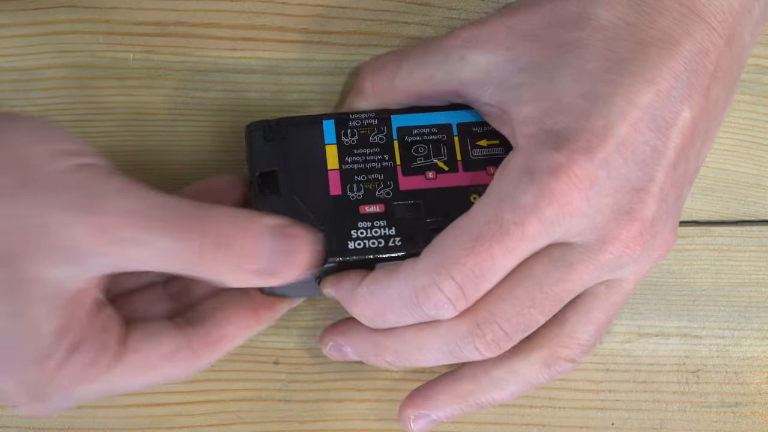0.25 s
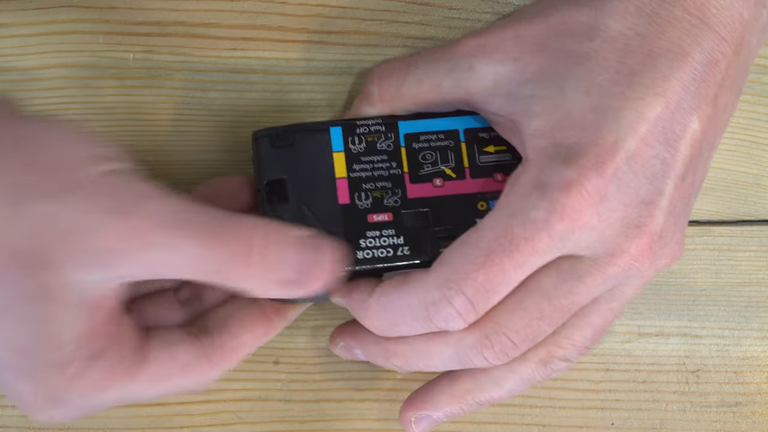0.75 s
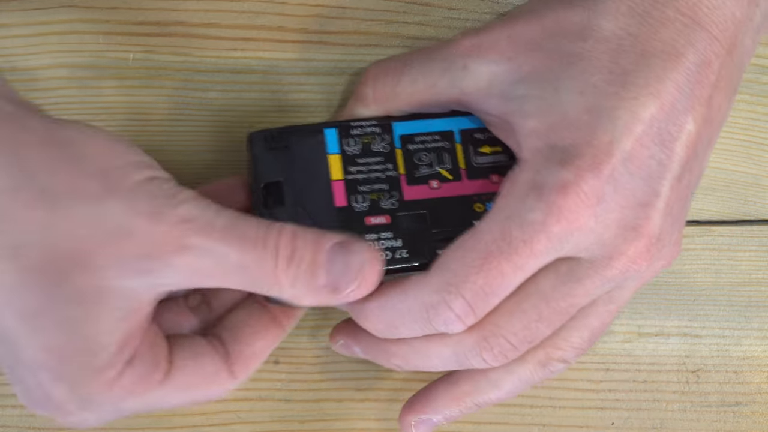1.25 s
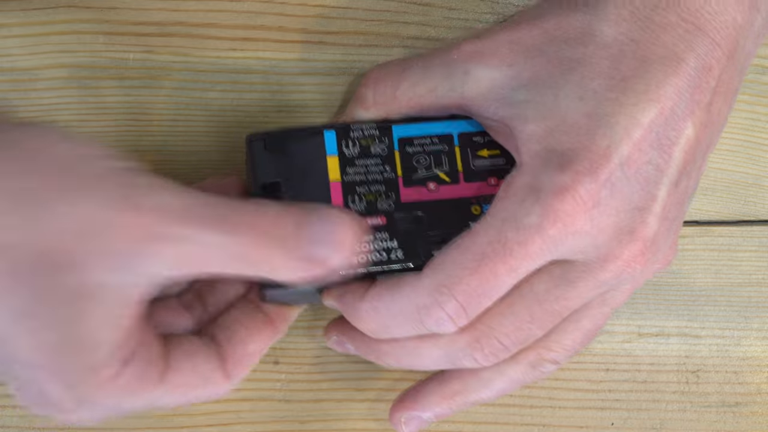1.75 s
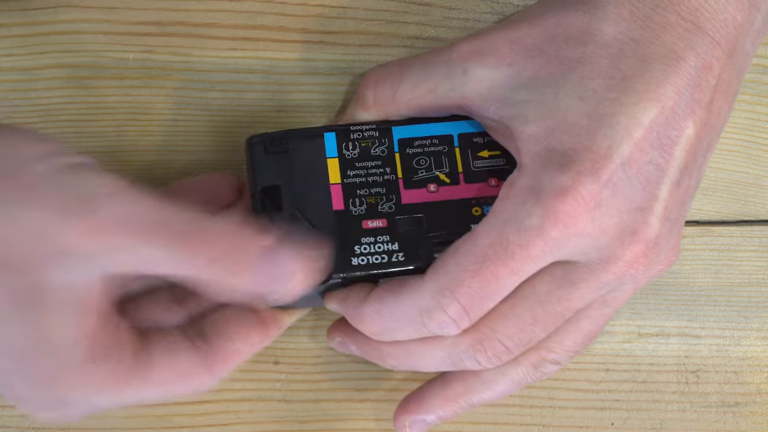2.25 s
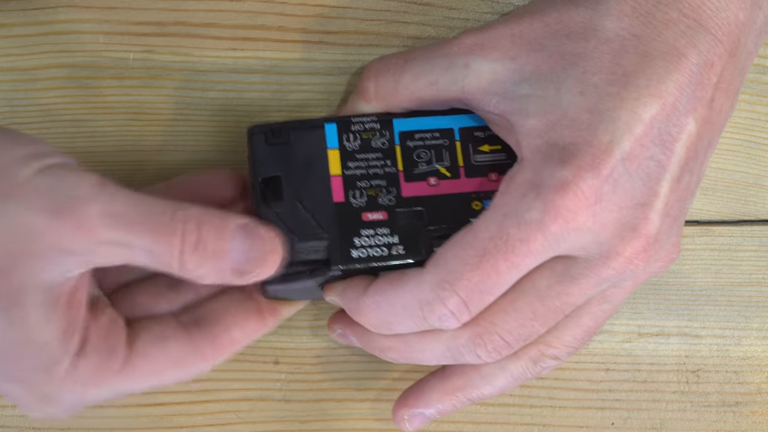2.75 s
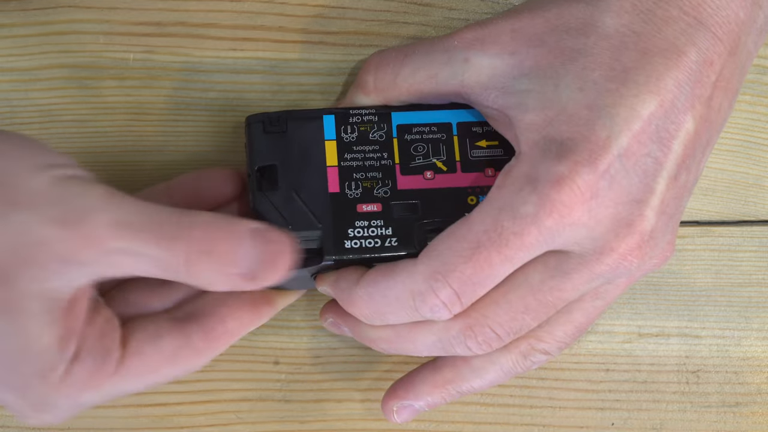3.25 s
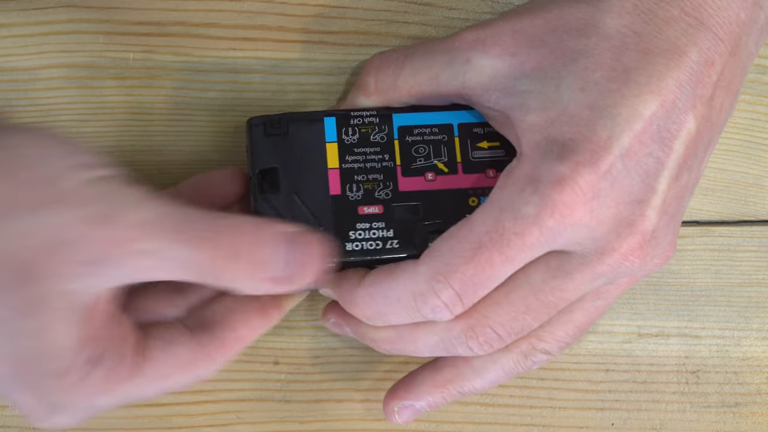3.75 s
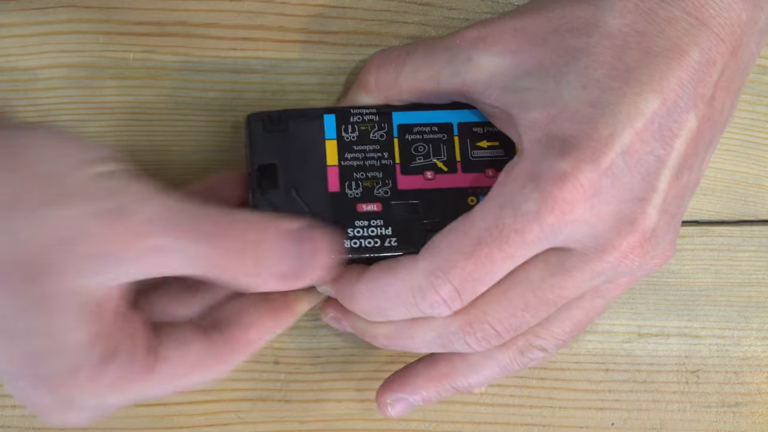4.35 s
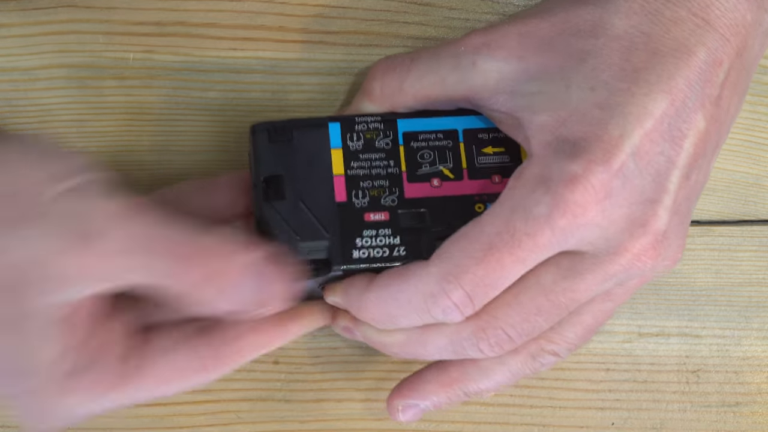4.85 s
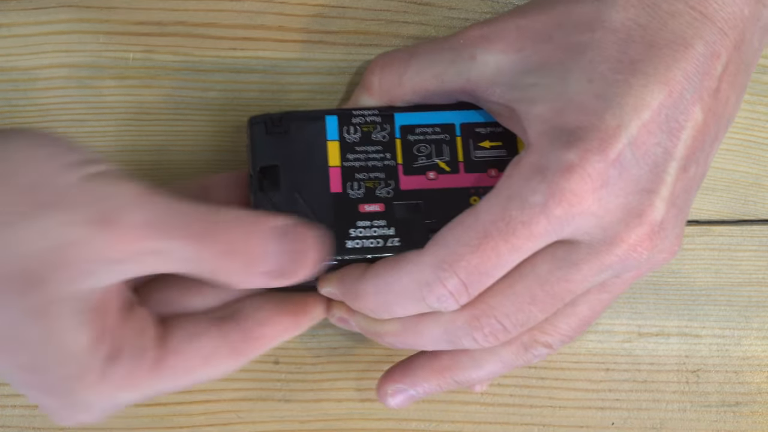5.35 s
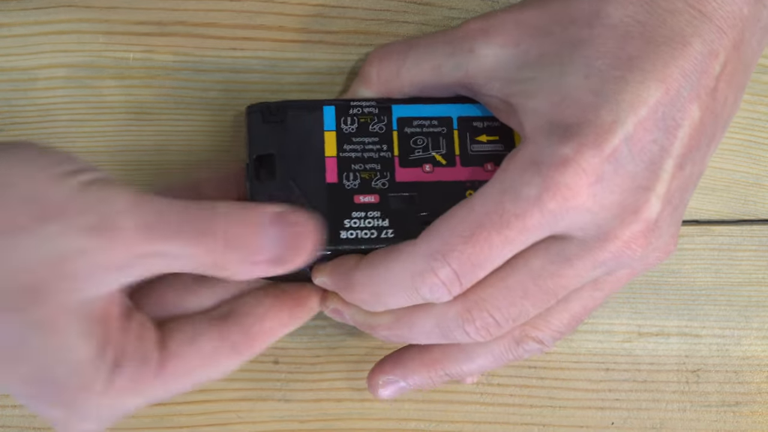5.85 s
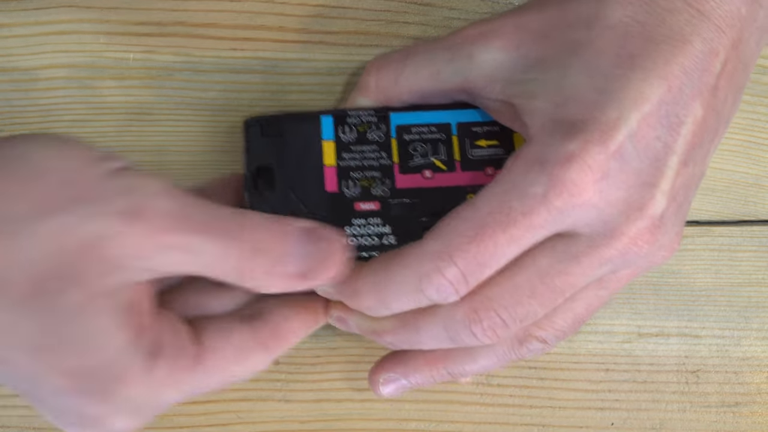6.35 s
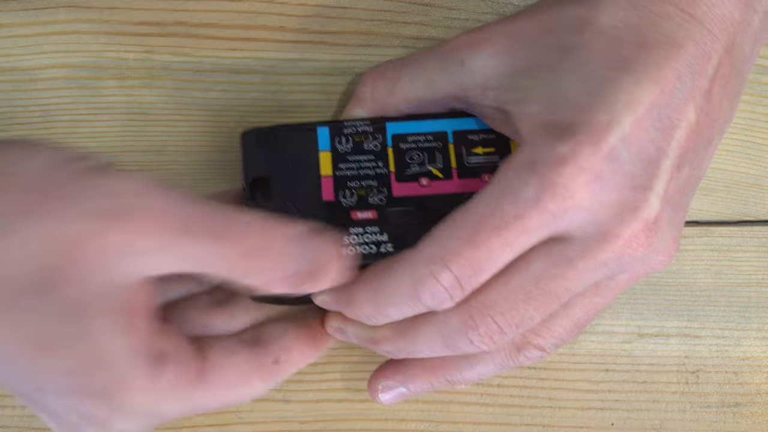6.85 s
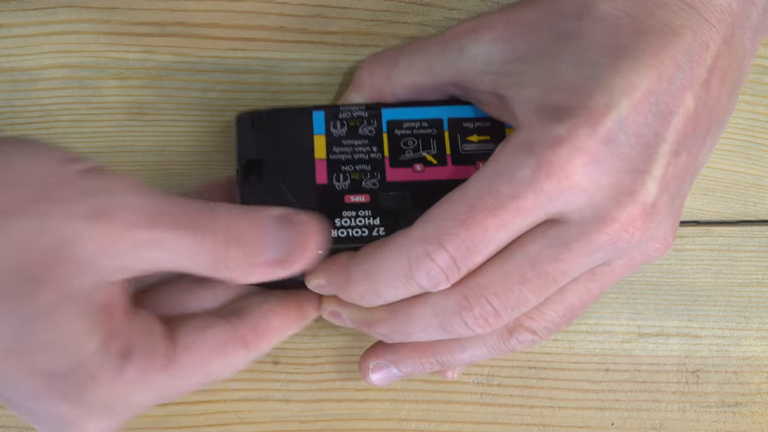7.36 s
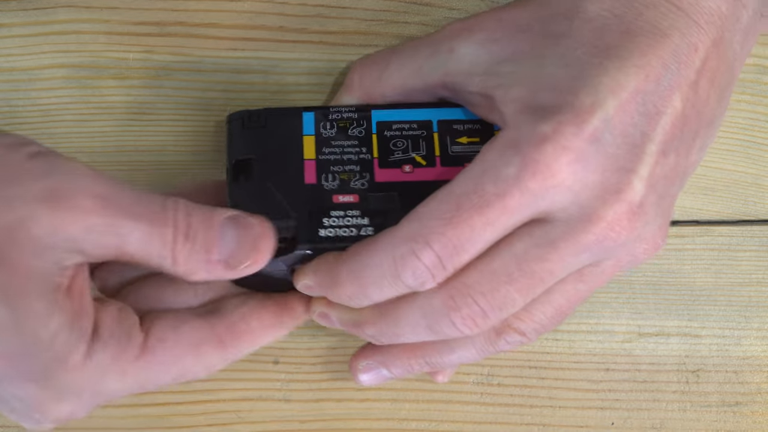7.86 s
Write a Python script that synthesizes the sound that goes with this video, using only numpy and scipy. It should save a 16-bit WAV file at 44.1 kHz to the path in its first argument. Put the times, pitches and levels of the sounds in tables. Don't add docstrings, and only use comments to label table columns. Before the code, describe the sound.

A small plastic thumbwheel ratchets in short bright zips, long even pulls turning to rapid flicks, with occasional sharp latch clacks, close up.

```python
import sys
import numpy as np
from scipy import signal
from scipy.fft import rfft, irfft
from scipy.io import wavfile
from scipy.ndimage import uniform_filter1d

SR = 44100
rng = np.random.default_rng(int(sys.argv[2]) if len(sys.argv) > 2 else 0)


def unload_audio(sound):
    columns = np.transpose(np.atleast_2d(sound))
    steps = np.round(np.clip(columns, -1, 1) * 32767)
    wavfile.write(sys.argv[1], SR, steps.astype(np.int16))


def field_ratio(decibels):
    return 10 ** (np.asarray(decibels, dtype=float) / 20)


N = 356769

# start in seconds, length in seconds, thumb force in dB,
# gain from start to end in dB, slip at the end in dB.
LONG_PULLS = [(0.0248, 0.076, -29, 7, -5), (0.295, 0.087, -30, 9, -20), (0.5559, 0.083, -25.5, 6, -26),
              (0.8203, 0.076, -25.5, 14.5, -13), (1.0792, 0.099, -29.5, 8, -9),
              (1.3666, 0.088, -25, 12.5, -20.5), (1.632, 0.094, -26.5, 14, -12),
              (1.8935, 0.089, -27.5, 14.5, -13.5), (2.181, 0.08, -27.5, -4.5, -16),
              (2.446, 0.086, -26, 8, -9.5), (2.7053, .092, -25.5, 14, -15.5),
              (2.9987, 0.073, -28.5, 1, -10), (3.26, .088, -26.5, 12, -14),
              (3.5168, 0.11, -27.5, 11.5, -17), (3.8013, 0.071, -33, -6, 3.5)]
# time in seconds, peak in dB.
LANDINGS = [(0.234, -31.5), (0.498, -30.5), (0.76, -26.5), (1.033, -29.5), (1.305, -25), (1.575, -28.5),
            (1.844, -25.5), (2.114, -25.5), (2.38, -26.5), (2.656, -24.5), (2.927, -25), (3.205, -25.5),
            (3.469, -24.5), (3.751, -27), (5.131, -39), (7.936, -30)]
# pitch in Hz, level in dB, seconds to die by 60 dB.
SHELL_MODES = [(2680, 5.5, 0.0084), (3346, 4, 0.031), (3613, -5.5, 0.035), (4057, 2.5, 0.02),
               (4744, -7, 0.022)]
# pitch in Hz, level in dB, seconds to die by 60 dB.
PAWL_MODES = [(5550, -4, 0.0017), (6690, 1.5, 0.0031), (7510, -0.5, 0.0026), (9217, -3.5, 0.0098),
              (10370, 4.5, 0.0011), (11750, -7, 0.0058), (13130, 1.5, 0.0032), (14220, 6, 0.0035),
              (15050, 1, 0.0035)]
# pitch in Hz, level in dB, seconds to die by 60 dB.
BODY_MODES = [(690, -16.5, 0.021), (1113, -12.5, 0.032), (1420, -7, 0.0073), (2032, -4, 0.016),
              (2605, -1.5, 0.0063)]
# pitch in Hz, level in dB, seconds to die by 60 dB.
LATCH_MODES = [(1250, 1, 0.0057), (1546, 1, 0.0083), (2005, -12.5, 0.031), (2800, -1.5, 0.007),
               (3680, -9, 0.023), (6000, 7, 0.00082)]

TEETH_PER_S = 300
DULL_PER_DB, USUAL_DB = 0.41, -29.5


def evened(x):
    return x / np.sqrt(np.mean(x ** 2) + 1e-20)


def read(points, hz):
    f, value = np.transpose(points)
    return np.interp(np.log(hz + 1), np.log(f + 1), value)


def ring(blows, modes, spread=0):
    hz, db, t60 = np.transpose(modes)[:, :, None]
    t = np.arange(0, t60.max(), 1 / SR)
    hz = hz * (1 + spread * rng.standard_normal(hz.shape))
    sense = (-1) ** np.arange(len(hz))[:, None]
    swings = sense * field_ratio(db - 60 * t / t60) * np.sin(2 * np.pi * hz * t)
    sound = swings.sum(axis=0)
    return signal.oaconvolve(blows, sound / np.linalg.norm(sound))[:len(blows)]


def shifting(blows, modes, spread):
    turn = rng.uniform(0, np.pi) + np.arange(len(blows)) / SR * 30
    return ring(blows * np.cos(turn), modes, spread) + ring(blows * np.sin(turn), modes, spread)


def snaps(s, db, length_s, size=N):
    starts = np.zeros(size)
    index = np.clip((np.asarray(s) * SR).astype(int), 0, size - 1)
    np.add.at(starts, index, field_ratio(2 * db))
    if not length_s:
        return np.sqrt(starts)
    age = np.arange(1, SR // 20) / SR / length_s
    fade = np.exp(-2 * age) * (1 - np.exp(-6 * age)) ** 2
    power = np.maximum(signal.oaconvolve(starts, fade / fade.sum())[:size], 0)
    return np.sqrt(power) * rng.standard_normal(size)


def background():
    # frequency in Hz, level in dB per Hz.
    air_spectrum = [(30, -20), (134, -7.5), (174, -9.5), (311, -6.5), (449, -13.5), (526, -8.5),
                    (1670, -23.5), (4300, -23.5), (5500, -33), (6700, -23), (8200, -31.5), (16000, -39)]
    # time in seconds, level in dB.
    shake_levels = [(0.0, -63), (0.61, -52), (0.65, -58), (2.16, -61), (2.23, -53), (3.33, -51),
                    (3.49, -42), (3.6, -50), (5.32, -62), (5.9, -53), (7.64, -67), (8.09, -54)]
    t, hz = np.arange(N) / SR, np.fft.rfftfreq(N, 1 / SR)
    air = irfft(rfft(rng.standard_normal(N)) * field_ratio(read(air_spectrum, hz)), N)

    waver = evened(uniform_filter1d(uniform_filter1d(rng.standard_normal(N), 3000), 3000))
    hum = field_ratio(-52 + 1.9 * waver) * np.sin(2 * np.pi * 119.8 * t)

    table = 1 / (1 + ((hz - 74) / 16) ** 4) + 0.35 / (1 + ((hz - 110) / 40) ** 2)
    shake = irfft(rfft(rng.standard_normal(N)) * table, N)
    push_db = sum(5.8 * np.exp(-((t - s - .05) / 0.11) ** 2) for s, _ in LANDINGS)
    shake_db = np.interp(t, *np.transpose(shake_levels)) - 3.5 + push_db
    return field_ratio(-51) * evened(air) + hum + field_ratio(shake_db) * evened(shake)


def room(x):
    # frequency in Hz, seconds to die by 60 dB.
    decay = [(500, 0.99), (2600, 0.53), (3500, 0.56), (4600, 0.55), (16000, 0.12)]
    hz, t, z = signal.stft(rng.standard_normal((2, SR // 3)), SR, nperseg=128)
    tails = signal.istft(z * field_ratio(-60 * t / read(decay, hz)[:, None]), SR, nperseg=128)[1]
    turn = 2 * np.pi * 2.3 * np.arange(N) / SR
    moving = x * np.array([np.cos(turn), np.sin(turn)])
    return signal.oaconvolve(moving, tails / np.linalg.norm(tails[0]), axes=1).sum(axis=0)[:N]


def film():
    slide_db, slide_t60_s = -7.5, 0.21
    drag, t = np.zeros(N + SR), np.arange(SR // 4) / SR
    for start, length, force_db, _, _ in LONG_PULLS:
        first = int((start + .8 * length) * SR)
        drag[first:first + len(t)] += field_ratio(force_db + slide_db - 60 * t / slide_t60_s)
    drag = drag[:N] * rng.standard_normal(N)
    return ring(drag, SHELL_MODES) + field_ratio(-2) * ring(drag, PAWL_MODES) + field_ratio(-9) * ring(drag, BODY_MODES)


def thumb():
    # time in seconds, peak in dB.
    faint_landings = [(4.455, -57), (4.968, -46), (5.315, -46), (5.615, -34), (7.343, -51), (7.739, -45)]
    out, size = np.zeros(N + SR), SR // 5
    for s, db in np.array([*LANDINGS, *faint_landings]) - [.003, 0]:
        scuff = snaps([0], db + 9.5, 0.012, size=size)
        scuff += snaps([.007, .013], np.array([db + 10, db - 3.5]), 0.00061, size=size)
        sound = field_ratio(-1) * ring(scuff, BODY_MODES[:3], 0.037) + ring(scuff, LATCH_MODES) + field_ratio(-0.9) * scuff
        first = int(s * SR)
        out[first:first + size] += sound
    return out[:N]


def latch():
    # time in seconds, peak in dB.
    releases = [(0.604, -5), (1.4182, -4.5), (2.1988, -3.5), (2.773, -2.5), (3.5382, -2), (3.935, -13.5),
                (4.354, -7), (4.4956, -9.5), (4.6883, -12.5), (4.8491, -8.5), (5.1983, -15), (5.4965, -7),
                (5.6688, -8.5), (5.8289, -12.5), (5.9997, -15), (6.1703, -5.5), (6.34, -5.5),
                (6.5005, -10.5), (6.6206, -10.5), (6.797, -13.5), (6.9641, -9), (7.4307, 0)]
    s, db = np.transpose(releases)
    s = np.r_[s, s + .0037]
    blows = snaps(s, np.r_[db + 11, db + 8], 0)
    rattle = snaps(s, np.r_[db + 5, db + 6], 0.0013)
    return ring(blows + rattle, LATCH_MODES) + field_ratio(-1.5) * rattle


def flick_teeth():
    # start in seconds, length in seconds, thumb force in dB, # late minus early
    # in dB, first tooth in dB.
    flicks = [(3.9163, 0.022, -28, 6, -14), (3.982, 0.03, -30, 1, -20), (4.0558, 0.029, -31, -1, -13),
              (4.119, 0.03, -32.5, 6, -14), (4.1937, 0.032, -33.5, -12, -16),
              (4.2602, 0.038, -34.5, -12, -22), (4.334, 0.024, -29, 5, -6),
              (4.4027, 0.026, -31, -2.5, -14), (4.473, 0.036, -31.5, -5, -13),
              (4.5403, 0.029, -31, -7, -23), (4.6139, 0.019, -31.5, 6, -10),
              (4.6855, .025, -33.5, -14, -15), (4.758, 0.026, -32, -9.5, -31),
              (4.8252, 0.027, -34, 11, -6), (4.8981, 0.022, -28, -2, -20),
              (4.9914, 0.034, -34.5, -11, -10.5),
              (5.0708, 0.042, -35, -3, -1.5), (5.1625, 0.044, -35.5, -3, -20),
                    (5.2443, 0.025, -31, 9, -23), (5.327, .030, -32, -7, -12),
                    (5.4004, 0.028, -34.5, -5, -14), (5.4764, 0.027, -32.5, 6.5, -4.5),
                    (5.5583, 0.025, -35, 6, -5), (5.6475, 0.027, -31, 2, -6),
                    (5.7318, 0.029, -32.5, 8.5, -12), (5.8143, 0.031, -28.5, -2, -19),
                    (5.8992, 0.024, -30.5, -4, -18), (5.9803, 0.034, -29.5, 1, -26),
                    (6.0655, 0.028, -33.5, 7, -13), (6.147, 0.033, -33, 7, -13), (6.237, 0.03, -32, 4, -7),
                    (6.3196, 0.043, -31.5, 1.5, -16.5), (6.4147, 0.025, -27.5, 6.5, -25),
                    (6.497, 0.032, -28.5, -5, -19), (6.5844, 0.025, -28.5, 1.5, -13),
                    (6.6707, 0.033, -30, 6, -17), (6.756, 0.041, -31.5, -2.1, -13.5),
                    (6.8448, 0.03, -32.5, 5, -22), (6.9366, 0.032, -31.5, 11, -9)]
    for start, length, held_db, lean_db, bite_db in flicks:
        angle = np.arange(length * TEETH_PER_S + 1)
        at = (angle + 0.22 * (angle > 0)) / TEETH_PER_S
        at[1:] += 0.00051 * rng.standard_normal(len(at) - 1)
        share = [0, .32, 0.74, 1]
        held_db = held_db + lean_db * np.array([-1, -1, 1, 1]) / 2
        force_db = np.interp(at / length, share, held_db + [bite_db, 0, 0, -5.5])
        push_db = np.interp(at / length, share, held_db) - USUAL_DB
        bright_db = 4.5 - 11 * at / length - DULL_PER_DB * push_db
        yield start + at, force_db, bright_db, -6, -6, -1.5


def stray_teeth():
    # time in seconds, force in dB.
    stiff_teeth = [(5.029, -34), (5.131, -29), (.900, -28), (1.730, -33), (5.813, -32), (6.066, -33),
                   (6.154, -27), (6.596, -29), (7.569, -37), (7.846, -26)]
    for s, force_db in stiff_teeth:
        yield s + np.array([0, .002]), force_db - np.array([3, 0]), -5, -2.5, -6, -7


def pull_force(start, length, force_db, lean_db, end_db):
    share = np.array([0, 0.084, 0.67, 1])
    return start + length * share, force_db + lean_db * (share - .5) + [-4, 0, 0, end_db]


def eased(start, length, count):
    share = np.linspace(0, 1, count)
    return start + length * (share + .22 * np.sin(2 * np.pi * share ** 1.8) / (2 * np.pi))


def pull_teeth():
    tooth_counts = [17, 20, 23, 23, 21, 19, 26, 25, 23, 26, 27, 22, 25, 30, 24]
    # time in seconds, thumb force in dB.
    slow_pulls = [
        [(7.0464, -40), (7.0707, -29.5), (7.0859, -24.5), (7.1027, -32.5), (7.114, -27), (7.1307, -24),
         (7.1461, -21.5), (7.1638, -31), (7.1715, -27.5)],
        [(7.4052, -32), (7.4237, -28), (7.4346, -29), (7.4506, -22.5), (7.4661, -26.5), (7.4776, -33),
         (7.5041, -39.5), (7.5278, -35), (7.5572, -32)],
        [(7.8005, -40), (7.8151, -30.5), (7.8267, -30.5), (7.8366, -26.5), (7.8415, -31.5), (7.8514, -25),
         (7.8628, -30), (7.8782, -35), (7.9044, -40.5)],
    ]
    angles = [
        (1, 4, 7, 10, 12, 15, 18, 21, 23),
        (1, 4, 6, 9, 12, 14, 17, 19, 22),
        (1, 3, 5, 7, 8, 10, 12, 14, 16),
    ]
    # boom in dB, spring in dB,
    # stick after the first tooth in milliseconds, pawl brightness in dB.
    grips = [(-7, -2, 12.3, -3.5), (-2, -26, 6.4, -1.5), (-3.5, -31, 5.5, -1), (-7.5, -5, 4.1, -0.5),
             (-5, -23, 4.8, -0.7), (-4.5, -26, 6.8, -1.5), (-11.5, -5, 2.7, -0.6), (-6, -1, 5.3, 0.3),
             (-4, -10, 5, 0), (-9.5, 0, 2.1, -1.1), (-7, -5, 4.4, -0.5), (-6, -4, 3.7, 1.9),
             (-8, -9, 4.4, 0), (-6, -6, 11, -0.5), (-4, -12, 5.6, 1.2), (-11.5, 10, 12, -6),
             (-6.5, 1, 13, -4.5), (-3.5, 3, 8.9, -2.5)]
    strokes = []
    for row, count in zip(LONG_PULLS, tooth_counts):
        strokes.append((*pull_force(*row), eased(*row[:2], count)))
    for pull, angle in zip(slow_pulls, angles):
        s, force_db = np.transpose(pull)
        strokes.append((s, force_db, np.interp(np.arange(1, angle[-1] + 1), angle, s)))

    for (s, force_db, at), (boom_db, spring_db, stick_ms, bright_db) in zip(strokes, grips):
        at = np.r_[s[0] - stick_ms / 1000, at]
        pace_db = 10 * np.log10(np.gradient(at) * TEETH_PER_S)
        force_db = np.interp(at, s, force_db)
        along = (at - s[0]) / (s[-1] - s[0]) - .5
        bright_db = bright_db - 4 * along - DULL_PER_DB * np.maximum(force_db - USUAL_DB, -5)
        force_db = force_db - 4 * (at < s[0])
        yield at, force_db + 0.96 * pace_db, bright_db, boom_db, spring_db, -7 - 2 * pace_db


def teeth():
    yield from flick_teeth()
    yield from stray_teeth()
    yield from pull_teeth()


def ratchet():
    # pitch in Hz, level in dB, seconds to die by 60 dB.
    spring_modes = [(3454, 7.5, 0.014), (3656, 1, 0.044)]
    # pitch in Hz, level in dB, seconds to die by 60 dB.
    tine_modes = [(9190, 1, 0.013), (9320, -2.5, 0.0089)]
    # time in seconds, level in dB.
    tine_freedom = [(0, -11.5), (3.9, -0.5), (4.9, -3), (5.3, 3.5), (5.7, -3.5), (6.3, -11.5), (8.1, -19)]
    out, size = np.zeros(N + SR), SR // 4
    for s, force_db, bright_db, boom_db, spring_db, rasp_db in teeth():
        first = int((s[0] - .01) * SR)
        uneven = rng.standard_normal((len(s), 4)).T
        s = s - first / SR + .0002 * uneven[0]
        force_db = force_db + 24
        tap = snaps(s, force_db + 1.6 * uneven[1], 0, size=size)
        knock = tap + snaps(s, force_db + rasp_db, .002, size=size)
        tick_db = force_db + bright_db + 0.97 * uneven[2]
        tick = snaps(s, tick_db, 0.0015, size=size) + snaps(s, tick_db + rasp_db - 1, 0.0066, size=size)
        thud = snaps(s, force_db + boom_db + 1.2 * uneven[3], .003, size=size)

        shell = shifting(knock, SHELL_MODES, 0.03) + field_ratio(spring_db) * ring(tap, spring_modes, 0.011)
        sound = shell / np.hypot(1, field_ratio(spring_db))
        sound += shifting(tick, PAWL_MODES, 0.015) + field_ratio(-4.5) * tick
        sound += shifting(thud, BODY_MODES, 0.051)
        free_db = np.interp(first / SR, *np.transpose(tine_freedom)) - 150 * np.arange(size) / SR
        out[first:first + size] += sound + ring(tick * field_ratio(free_db), tine_modes, 0.011)
    return out[:N]


def scene():
    small = signal.butter(4, 500, "highpass", fs=SR, output="sos")
    camera = signal.sosfilt(small, ratchet() + latch() + thumb() + film())
    return (camera + field_ratio(-28.5) * room(camera) + background())[None]


def band_limit(x):
    return signal.sosfilt(signal.butter(12, 16970, fs=SR, output="sos"), x)


def record(dry):
    edge = signal.firwin(201, 16100, window=("kaiser", 5), fs=SR)
    rounded = .85 * np.tanh(dry / .85)
    return band_limit(signal.oaconvolve(rounded, edge[None], "same"))


dry = scene()
out = record(dry)
unload_audio(out)
```